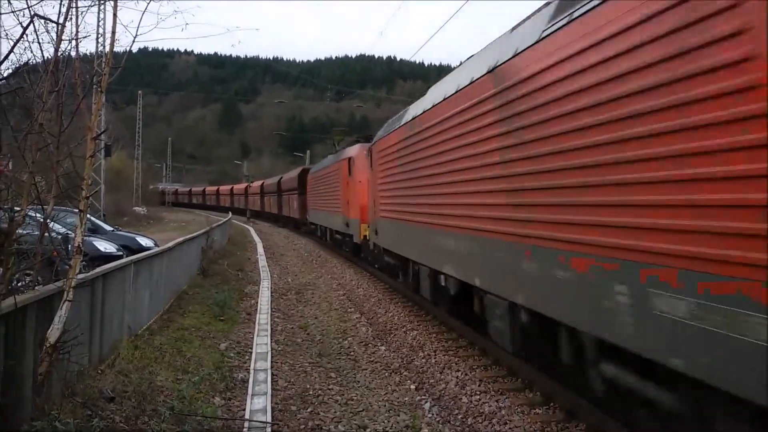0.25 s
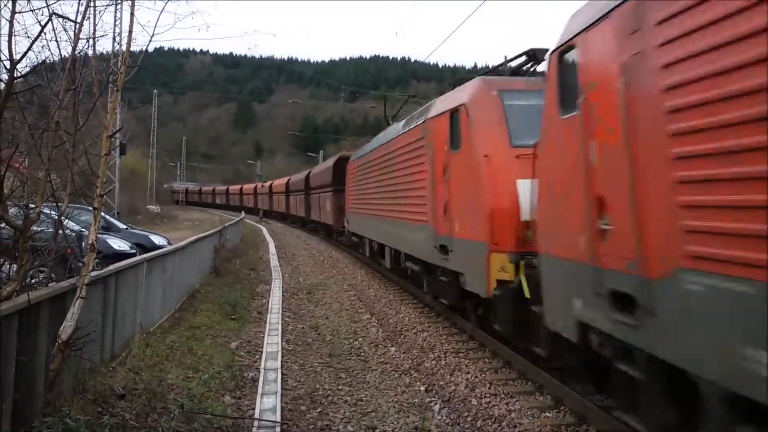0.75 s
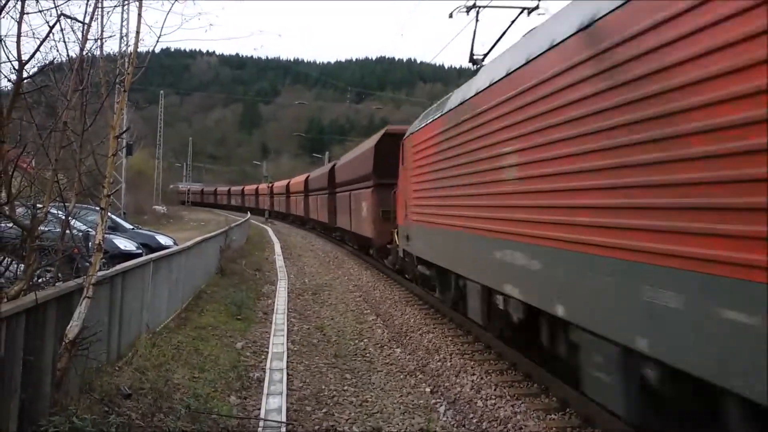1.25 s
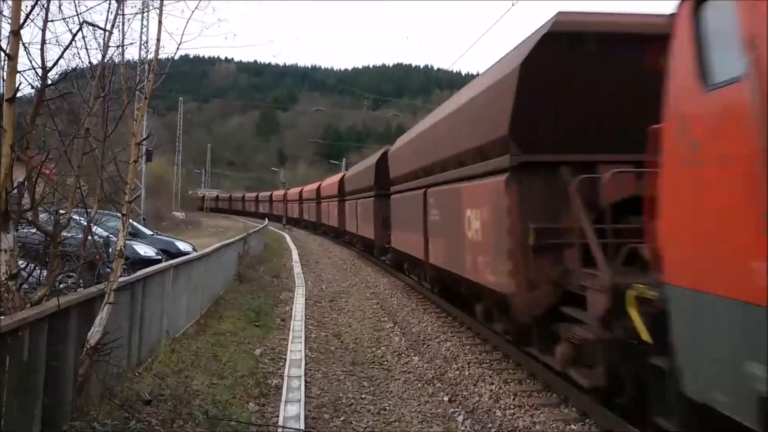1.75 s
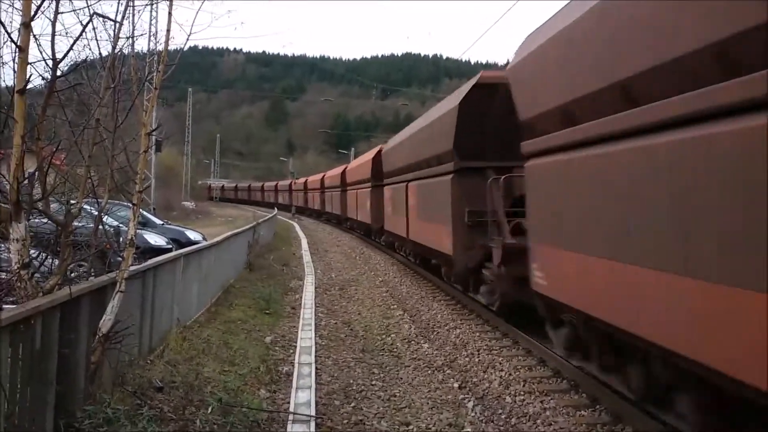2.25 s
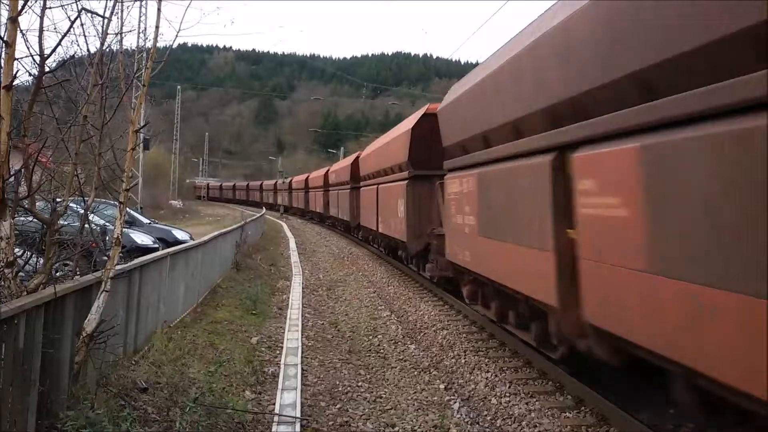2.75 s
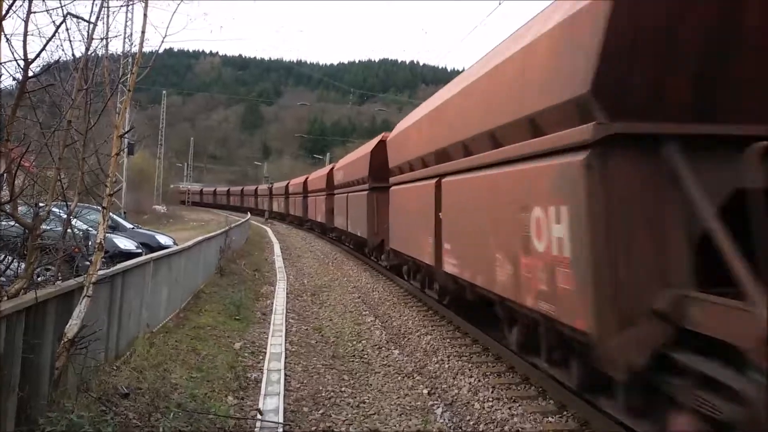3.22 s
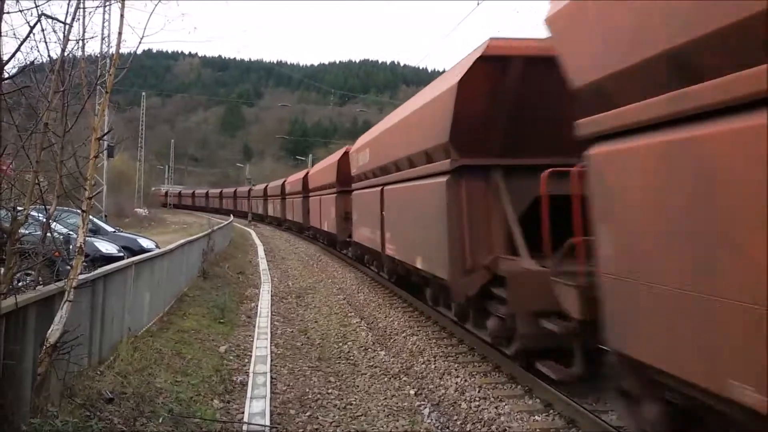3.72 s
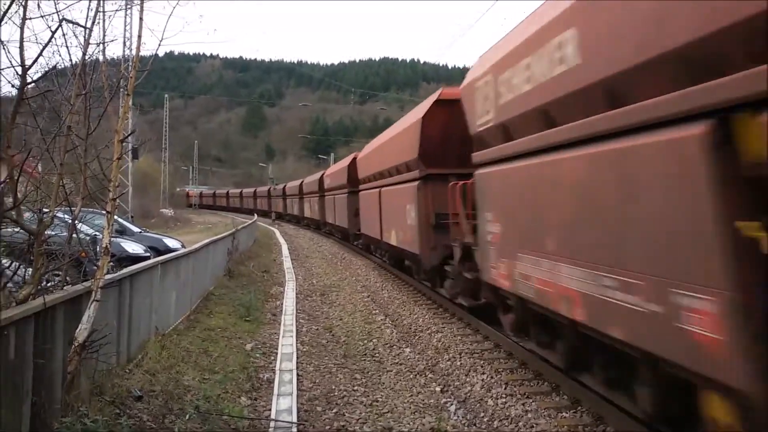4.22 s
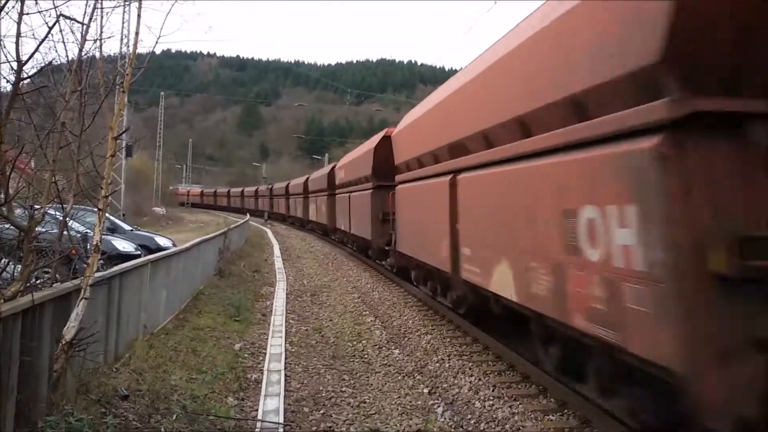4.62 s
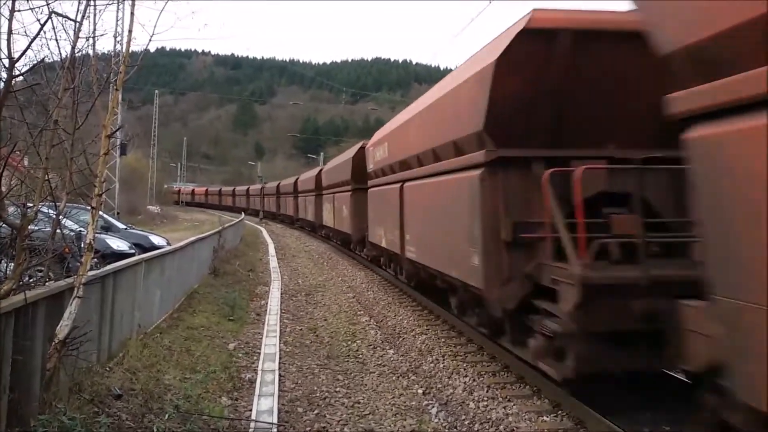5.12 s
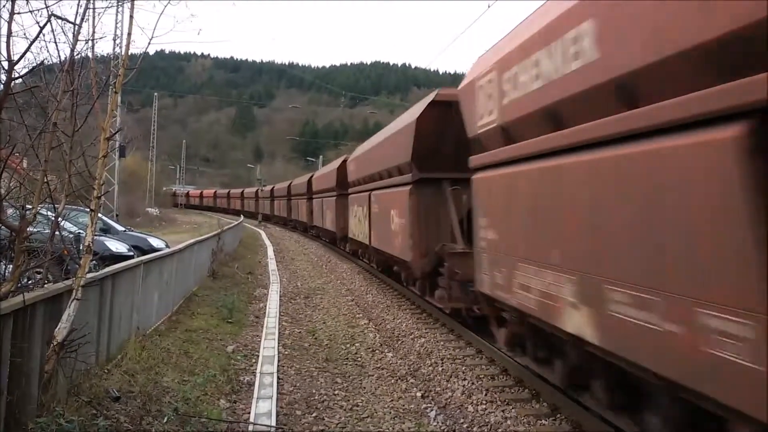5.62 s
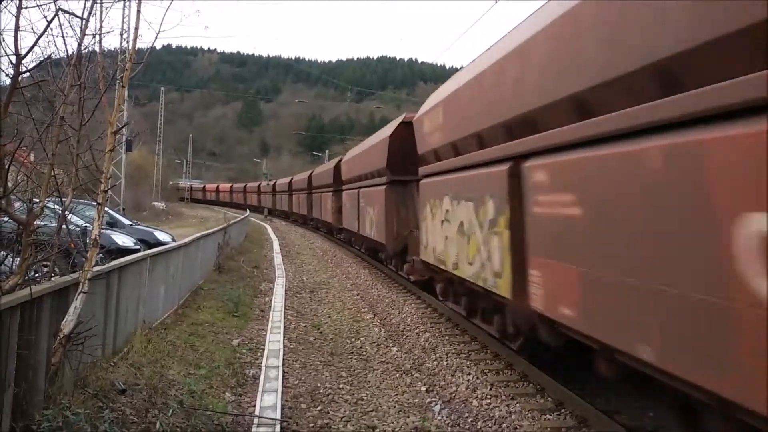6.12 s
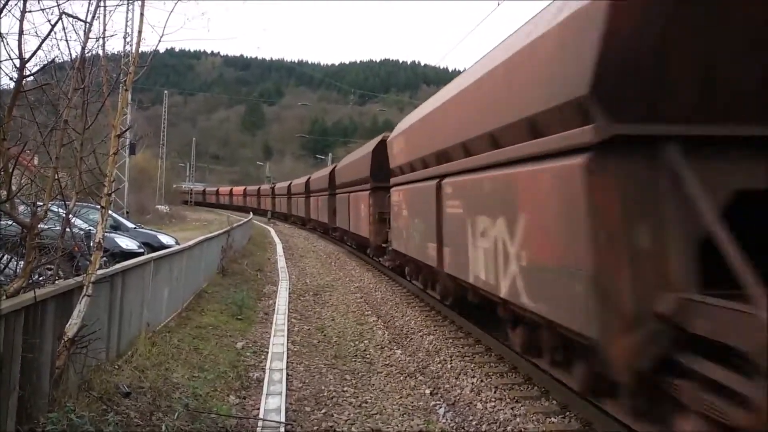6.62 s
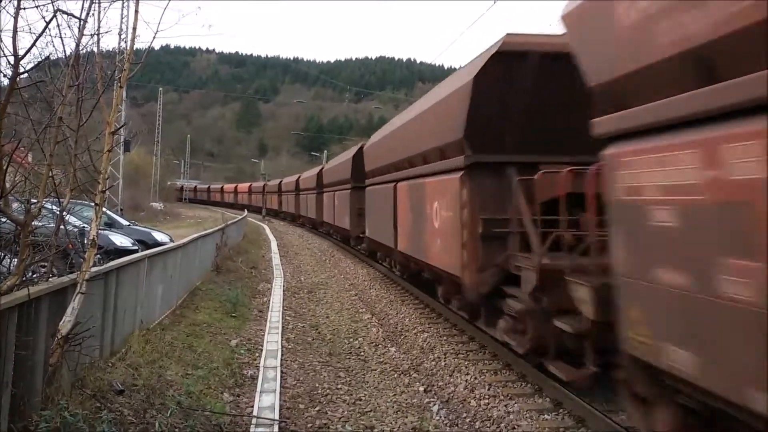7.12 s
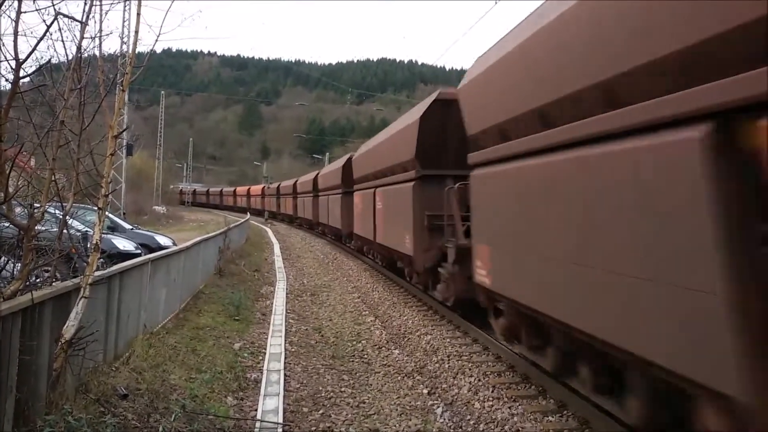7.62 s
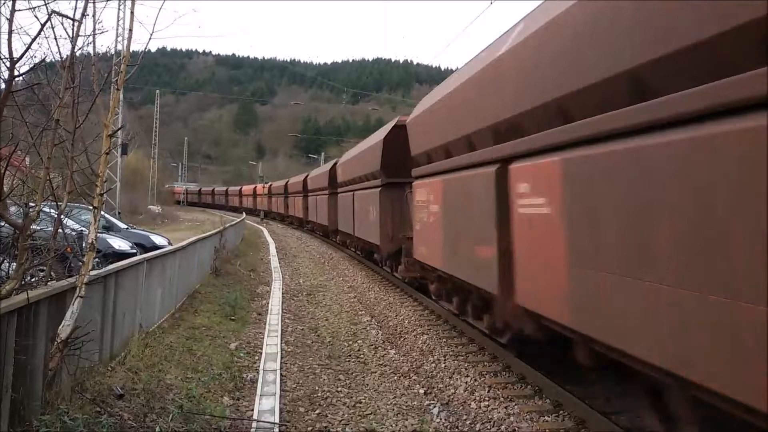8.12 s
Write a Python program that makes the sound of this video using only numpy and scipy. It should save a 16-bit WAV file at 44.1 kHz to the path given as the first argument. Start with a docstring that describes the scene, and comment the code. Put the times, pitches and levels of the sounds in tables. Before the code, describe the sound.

Outdoors right beside a railway track, two electric locomotives sweep past with a fuzzy, wavering mid-high whine, droning blowers and low surges. Around one and a half seconds, slipstream batters the small microphone in harsh, distorted slaps. The whine vanishes and hopper wagons follow with a steady rolling roar, hissing and slightly metallic, swelling as bogies pass and growing louder, with lighter wind thumps. Mono, close, dry.

```python
"""Beside a railway line, two electric locomotives and a string of hopper wagons rush past a small microphone.
The drives whine as fuzzy and gliding tones, and the blowers drone and hiss as filtered noise.
Then the wagon wheels roar on the rails: coloured noise with narrow ringing bands.
The slipstream slaps the microphone in short noise bursts, and the recorder's limiter ducks under the hardest."""
import sys
import numpy as np
from scipy import signal
from scipy.fft import rfft, irfft, next_fast_len
from scipy.io import wavfile
from scipy.ndimage import uniform_filter1d, map_coordinates

SR = 44100
rng = np.random.default_rng(int(sys.argv[2]) if len(sys.argv) > 2 else 0)


def to_wav(sig):
    """Store sig (one row per channel, or 1-D mono) as 16-bit WAV at the path in sys.argv[1].

    Samples outside -1..1 are clipped; the rate is SR.
    """
    pcm = np.clip(np.atleast_2d(sig), -1, 1) * 32767
    pcm = np.round(pcm).astype(np.int16)
    wavfile.write(sys.argv[1], SR, pcm.T)  # frames by channels


N = 368676
TIME = np.arange(N) / SR
TOP_HZ = 14800  # the recorder's band limit

# All spectra are relative: the noise they colour is afterwards brought to rms 1.
# Widths of resonances and fuzzy tones are full widths, about 4 dB down.

# Gusts of slipstream. Each row: start in seconds, length in seconds, level in dB.
GUSTS = [(0.038, 0.7, -21.5), (0.923, 0.23, -24), (1.312, 0.24, -22), (1.62, 0.085, -11.5),
         (1.792, 0.036, -15), (2, 0.25, -20.5), (2.587, 0.12, -18), (3.05, 0.13, -22.5),
         (3.558, 0.355, -20.5), (3.99, 0.45, -20.5), (5.11, 0.26, -23), (5.574, 0.043, -27),
         (5.82, 0.15, -21.5), (6.21, 0.27, -23.5), (6.84, .12, -21), (7.024, 0.042, -19),
         (7.167, 0.17, -19), (7.928, 0.13, -20.5)]
GUST_RISE_S, GUST_FALL_S, LULL_DB = 0.07, 0.051, -29.5
# Colour of the slipstream's flutter. Each row: frequency in Hz, density in dB per Hz.
SLIPSTREAM_SPECTRUM = [(15, -24), (30, -13), (60, 5), (110, 8.5), (200, 4.5), (400, -4.5), (1200, -92)]
# Small eddies carried in the gusts: rate, typical length, level over the gust, typical brightness.
EDDIES_PER_S, EDDY_S, EDDY_DB, EDDY_HZ = 14, 0.012, -1, 420
# The hardest eddies that hit the microphone.
# Each row: start in seconds, length in seconds, level in dB before the port, brightness in Hz.
BUFFETS = [(.288, 0.023, -8.5, 555), (.289, 0.0043, -10, 1100), (.42, 0.094, -18.5, 396),
           (.6, 0.037, -14.5, 350), (.748, 0.03, -16.5, 795), (1.58, 0.013, -5, 5270),
           (1.572, 0.036, -14.5, 1500), (1.608, 0.012, -2.5, 4316), (1.605, 0.075, -6, 1710),
           (1.621, 0.026, -1.5, 4100), (1.623, 0.04, -4, 330), (1.643, 0.018, 2.5, 4160),
           (1.673, 0.0098, -4.5, 3200), (1.659, 0.0087, -13, 2600), (1.692, 0.025, -5.5, 850),
           (1.753, 0.014, -7, 450), (1.764, 0.019, -7.5, 2710), (1.79, 0.0016, 1.5, 3580),
           (1.803, 0.044, -13.5, 1390), (1.812, 0.012, -21, 2400), (1.829, 0.015, -9.5, 2700),
           (1.892, 0.022, -15, 1200), (1.898, 0.0061, -22, 2300), (1.915, 0.011, -14.5, 1300),
           (1.968, 0.025, -18.5, 650), (2.086, 0.023, -17.5, 1200), (2.093, 0.003, -11, 2800),
           (2.156, 0.022, -18.5, 1400), (2.159, 0.006, -13.5, 1700), (2.403, 0.031, -24, 400),
           (2.409, 0.0035, -14.5, 1100), (2.557, 0.013, -19, 500), (2.611, 0.043, -20, 520),
           (2.676, 0.015, -15, 850), (3.011, 0.042, -15.5, 490), (3.066, 0.067, -18, 450),
           (3.193, 0.0066, -10.5, 450), (3.555, 0.047, -14, 760), (3.635, 0.0063, -12, 1010),
           (3.677, 0.051, -13, 990), (3.736, 0.019, -11, 1350), (3.742, 0.015, -7.5, 400),
           (3.76, 0.023, -14, 700), (3.834, 0.005, -12.5, 1290), (3.843, 0.0057, -6, 900),
           (4.326, 0.017, -14.5, 700), (4.344, 0.016, -9.5, 1240), (4.379, 0.0054, -9.5, 450),
           (4.424, 0.082, -20, 350), (4.452, .015, -16, 520), (6.91, 0.062, -13.5, 650),
           (6.937, 0.026, -9, 1250), (6.944, 0.012, -6.5, 900), (7.008, 0.018, -13, 600),
           (7.034, 0.029, -9.5, 900), (7.051, 0.0089, -8, 1000), (7.134, 0.0089, -12, 543),
           (7.248, 0.019, -10, 560), (7.295, .014, -18, 450), (7.96, 0.092, -12, 583)]

# The locomotives' drives. Each row: time in seconds, whine in Hz, relative whine level in dB, blower level in dB.
DRIVE = [(0, 1278, -27.5, -29), (.21, 1291, -27, -18), (.35, 1262, -33.5, -22), (.5, 1261, -26.5, -20.5),
         (.62, 1242, -26, -21), (.8, 1260, -27, -22.5), (.97, 1304, -29, -21), (1.15, 1246, -24.5, -22),
         (1.29, 1276, -29, -26), (1.53, 1221, -24.5, -17.5)]
# Orders of the gear mesh. Each row: multiple of the mesh rate, width in Hz, relative level in dB.
MESH_ORDERS = [(1, 24, -2.5), (2, 117, 2.5), (3, 135, -2)]
# Resonances of the blower ducts. Each row: centre in Hz, width in Hz, relative level in dB.
DUCTS = [(221, 130, -5.5), (323, 85, 4), (438, 37, -3), (587, 90, -12.5)]
# The cooling outlet of each locomotive goes by. Each row: start in seconds, length in seconds, level in dB.
OUTLETS = [(0.272, 0.23, -34), (1.228, 0.19, -35)]
# Colour of the cooling hiss. Each row: frequency in Hz, density in dB per Hz.
COOLING_SPECTRUM = [(5000, -23), (9500, -0.5), (11000, -7), (12700, 3), (14500, -1.5)]
# The four driven axles of the second locomotive.
# Each row: start in seconds, length in seconds, pitch in Hz, Doppler glide in Hz per second, level in dB.
AXLES = [(.82, 0.37, 1274, -150, -24.5), (0.942, .36, 1330, -190, -25), (1.249, .27, 1258, -250, -23.5),
         (1.39, 0.16, 1288, -160, -26.5)]
# Narrow low surges as the first locomotive sweeps by.
# Each row: start in seconds, length in seconds, pitch in Hz, glide in Hz per second, level in dB.
SURGES = [(.14, .03, 636, 0, -24.5), (0.253, 0.065, 205, 201, -15.5), (0.307, 0.038, 387, 302, -17),
          (0.311, .06, 520, 1299, -22.5), (0.428, 0.065, 288, 600.5, -16), (.48, .05, 540, 1, -29),
          (.59, 0.062, 254.6, -150, -12.5), (.65, .045, 440, 1299.5, -21), (.7, .03, 180, -400, -16.5),
          (.765, .09, 580, 650, -21)]

# Rolling effort, set by how rough the passing wheels are. Each row: time in seconds, relative level in dB.
ROLLING_EFFORT = [(0, -33.5), (.5, -32), (.9, -38.5), (1.13, -38), (1.22, -33.5), (1.52, -35), (1.75, -38),
                  (2.3, -32.5), (2.85, -30), (3.18, -25.5), (3.45, -22), (3.8, -29.5), (4.15, -26.5),
                  (4.5, -26), (4.92, -27.5), (5.45, -22), (5.65, -23), (6.25, -19.5), (6.65, -17.5),
                  (6.85, -19), (7.05, -24), (7.4, -21), (7.75, -23.5), (8.36, -21)]
# Bogies that stand out as they go by. Each row: start in seconds, length in seconds, swell in dB.
BOGIES = [(0.174, 0.041, 3.5), (0.508, 0.055, 2.5), (1.39, 0.1, 2.5), (3.226, 0.049, 1), (3.617, 0.05, 6),
          (3.877, 0.12, 4.5), (4.077, 0.049, 2.5), (4.379, 0.022, 5), (4.633, 0.064, 7),
          (4.754, 0.055, 3.5), (5.022, 0.072, 6.5), (5.283, 0.061, 3), (5.71, 0.088, 3.5), (5.91, 0.15, 2),
          (7.187, 0.019, 1), (7.992, 0.011, 3), (8.16, 0.06, 3.5)]
BOGIE_RISE_S, BOGIE_FALL_S = 0.015, 0.038
# Colours of the rolling hiss and rumble. Each row: frequency in Hz, density in dB per Hz.
LOCO_HISS = [(1240, -18), (2100, 1.5), (2380, -0.5), (2590, -1.5), (2970, 1), (4500, 4.5), (8750, -14),
             (10500, -32), (11000, -52), (14300, -42), (22000, -120)]
WAGON_HISS = [(650, -33), (1100, -9), (1280, -3.5), (1890, -3), (2300, 0), (3960, 0), (5440, -5.5),
              (6800, -15), (8240, -21), (9400, -28), (11000, -57), (14500, -53.5)]
LOCO_RUMBLE = [(50, -10.5), (130, 6), (230, 7.5), (350, -6.5), (520, 1), (800, -6.5), (1100, -6.5),
               (1900, -12), (3000, -16.5), (6000, -69)]
WAGON_RUMBLE = [(60, -10.5), (150, -2), (290, 4), (420, 0.5), (680, -1.5), (900, -2.5), (1200, -12),
                (2000, -5.5), (4000, -80.5)]
# Rumble level under the locomotives; under the wagons at the reference effort, and dB per dB of effort.
LOCO_RUMBLE_DB, WAGON_RUMBLE_DB, REFERENCE_DB, RUMBLE_FOLLOWS = -17.5, -22.5, -24.5, 0.69
RUMBLE_GROWS_DB_PER_S = 0.61  # the later wagons rumble more
# Resonances of wheels and rails. Each row: centre in Hz, width in Hz, relative level in dB.
WHEEL_RINGS = [(476, 21, -11.5), (566, 39, -14.5), (978, 140, -9.5), (1905, 150, -14.5), (3870, 280, -13)]


def amp(db):
    """Level to gain: 20 dB is a factor of ten in pressure."""
    return 10 ** (np.asarray(db) / 20)


def unit(x):
    """Normalisation: scale to rms 1."""
    return x / np.sqrt(np.mean(np.abs(x) ** 2) + 1e-20)


def curves(rows):
    """Linear interpolation: one value per sample for each column after the time."""
    times, *columns = np.transpose(rows)
    return [np.interp(TIME, times, column) for column in columns]


def wobble(rate):
    """Slow random fluctuation: a smooth curve through rate random knots a second."""
    knots = rng.standard_normal(int(N * rate / SR) + 4)
    return map_coordinates(knots, [TIME * rate])


def swell(start, hold, rise, fall):
    """Envelope of a passage: Gaussian rise, hold at 1, Gaussian fall."""
    before = np.minimum(TIME - start, 0) / rise
    after = np.maximum(TIME - start - hold, 0) / fall
    return np.exp(-before ** 2 - after ** 2)


def filtered(x, response):
    """Linear filtering: multiply the spectrum by a response of frequency."""
    size = next_fast_len(len(x) + 8192)
    spectrum = rfft(x, size) * response(np.fft.rfftfreq(size, 1 / SR))
    return irfft(spectrum, size)[:len(x)]


def rush(spectrum, patchy_db):
    """Turbulent noise of rms 1: a given colour, with patches of random gain in time and frequency."""
    z = signal.stft(rng.standard_normal(N), nperseg=512)[2]
    field = uniform_filter1d(rng.standard_normal(z.shape), size=8, axis=0)  # patches about 700 Hz wide
    field = uniform_filter1d(field, size=10, axis=1)  # and about 60 ms long
    noise = signal.istft(z * amp(patchy_db * unit(field)), nperseg=512)[1][:N]
    f, db = np.transpose(spectrum)
    return unit(filtered(noise, lambda hz: amp(np.interp(np.log(hz + 1), np.log(f), db))))


def resonance(centre_hz, width_hz):
    """Forced resonance: noise of rms 1 in one steep-sided band."""
    noise = rng.standard_normal(N)
    return unit(filtered(noise, lambda hz: 1 / (1 + ((hz - centre_hz) / width_hz * 1.47) ** 2)))


def phase_of(hz):
    """Phase is the running integral of frequency."""
    return 2 * np.pi * np.cumsum(hz) / SR


def fuzzy_tone(phase, width_hz):
    """Narrow-band noise of rms 1: a tone whose two quadratures drift at random."""
    def drift():
        return filtered(rng.standard_normal(N), lambda hz: 1 / (1 + (hz / width_hz * 1.5) ** 2))
    return unit(drift() * np.cos(phase) + drift() * np.sin(phase))


def handover(loco, wagons, at=1.64, span=0.29):
    """Equal-power crossfade: the locomotives' sound gives way to that of the wagons."""
    share = np.clip((TIME - at) / span + .5, 0, 1)
    return np.sqrt(1 - share) * loco + np.sqrt(share) * wagons


def wind():
    """Strength of the air flow: the strongest gust, added in power to a steady draught."""
    gusts = [amp(db) * swell(s, length, GUST_RISE_S, GUST_FALL_S) for s, length, db in GUSTS]
    return np.hypot(amp(LULL_DB), np.max(gusts, axis=0))


def slipstream(flow):
    """Turbulent pressure: air dragged along by the train flutters on the microphone."""
    flutter = amp(0.91 * wobble(rate=43))
    return flow * unit(flutter * rush(SLIPSTREAM_SPECTRUM, patchy_db=2.5))


def gust_eddies(flow):
    """Random shedding: buffet rows at jittered moments, as strong as the flow that carries them."""
    chance = rng.standard_normal((int(EDDIES_PER_S * N / SR), 3))
    times = (np.arange(len(chance)) + .5 + .3 * chance[:, 0]) / EDDIES_PER_S
    times = np.clip(times, 0, TIME[-1])
    flow_db = 20 * np.log10(np.interp(times, TIME, flow))
    return [(s, EDDY_S * np.exp(0.47 * longer), db + EDDY_DB, EDDY_HZ * np.exp(0.4 * brighter))
            for s, db, (_, longer, brighter) in zip(times, flow_db, chance)]


def buffets(eddies, edge_s=0.0018, wake=0.16, low_hz=95, steep=1.76, tilt=0.97, lumpy_db=3, port_hz=6800):
    """Eddy impact: a lumpy burst of pressure with a fading wake; a faster eddy's finer swirls sound brighter."""
    out = np.zeros(N + SR)
    t = np.arange(SR // 5) / SR
    for s, length, db, bright_hz in eddies:
        decay = np.exp(-np.maximum(t - length, 0) / (wake * length))
        gate = np.clip(t / edge_s, 0, 1) * decay
        swirls = unit(uniform_filter1d(rng.standard_normal(len(t)), size=70))
        pressure = rng.standard_normal(len(t)) * amp(lumpy_db * swirls)
        corner_hz = low_hz + 0.025 * bright_hz  # brighter eddies carry less bass

        def colour(hz):
            hump = (hz / (hz + corner_hz)) ** 2 * (1 + hz / corner_hz) ** -tilt
            return hump / np.sqrt(1 + (hz / bright_hz) ** (2 * steep))

        burst = gate * filtered(pressure, colour)
        out[round(s * SR):][:len(t)] += amp(db) * unit(burst) * np.sqrt(np.mean(gate ** 2))
    # the narrow port dulls the finest swirls
    return filtered(out[:N], lambda hz: 1 / np.sqrt(1 + (hz / port_hz) ** 8))


def growl(fade_s=0.013, width_hz=30):
    """Gliding narrow-band noise: short low surges, most of them climbing in pitch."""
    return sum(amp(db) * swell(s, length, fade_s, fade_s)
               * fuzzy_tone(phase_of(hz + glide * (TIME - s)), width_hz)
               for s, length, hz, glide, db in SURGES)


def near_axles(fade_s=0.023, flutter_hz=5):
    """Doppler shift and beating: each driven axle sinks in pitch going by and beats against its neighbour."""
    total = np.zeros(N)
    for s, length, hz, glide, db in AXLES:
        pitch_hz = hz + glide * (TIME - s) + flutter_hz * wobble(rate=45)
        total += amp(db) * swell(s, length, fade_s, fade_s) * unit(np.sin(phase_of(pitch_hz)))
    return total


def locomotives(outlet_fade_s=0.11):
    """Gear mesh and duct resonance: several axles blur into a whine; blowers drone and hiss at the outlets."""
    whine_hz, whine_db, blower_db = curves(DRIVE)
    mesh_phase = phase_of(whine_hz + 10 * wobble(rate=40)) / 2  # the whine is the second mesh order
    gears = sum(amp(db) * fuzzy_tone(round(order) * mesh_phase, width) for order, width, db in MESH_ORDERS)
    blowers = unit(sum(amp(db) * resonance(hz, width) for hz, width, db in DUCTS))
    gone_s = np.maximum(TIME - DRIVE[-1][0], 0)  # since the second machine went past
    drive = amp(whine_db - 23.6 * gone_s) * gears + amp(blower_db - 34 * gone_s) * blowers
    # the hiss beams sideways, so it swells only as each outlet passes
    beam = sum(amp(db) * swell(s, length, outlet_fade_s, outlet_fade_s) for s, length, db in OUTLETS)
    return drive + near_axles() + growl() + beam * rush(COOLING_SPECTRUM, patchy_db=7.0)


def wheel_rings(pitch_spread=.012, uneven_db=1.0):
    """Modal ringing of wheels and rails: pitch and strength vary as one wheel follows another."""
    shift = 1 + pitch_spread * wobble(rate=5)
    return sum(amp(db) * unit(amp(uneven_db * wobble(rate=7)) * fuzzy_tone(phase_of(hz * shift), width))
               for hz, width, db in WHEEL_RINGS)


def rolling():
    """Roughness excitation: hiss and ringing from wheels on rails, rumble from track and bodies."""
    effort_db, = curves(ROLLING_EFFORT)
    bogie_db = sum(db * swell(s, length, BOGIE_RISE_S, BOGIE_FALL_S) for s, length, db in BOGIES)
    tread_db = 0.83 * wobble(rate=55)  # the contact patches grip unevenly
    loco_hiss = amp(7.5) * rush(LOCO_HISS, patchy_db=0.5)
    wagon_hiss = amp(2.0) * rush(WAGON_HISS, patchy_db=1.1) + wheel_rings()
    hiss = amp(effort_db + bogie_db + tread_db) * handover(loco_hiss, wagon_hiss)

    rumble_db = WAGON_RUMBLE_DB + RUMBLE_FOLLOWS * (effort_db - REFERENCE_DB)
    rumble_db += RUMBLE_GROWS_DB_PER_S * (TIME - TIME.mean())
    loco_rumble = amp(LOCO_RUMBLE_DB) * rush(LOCO_RUMBLE, patchy_db=2)
    wagon_rumble = amp(rumble_db) * rush(WAGON_RUMBLE, patchy_db=1.15)
    rumble = amp(0.16 * wobble(rate=23)) * handover(loco_rumble, wagon_rumble)
    return hiss + rumble


def scene():
    """Superposition: all pressures add at one microphone, which feeds both channels."""
    flow = wind()
    eddies = [*BUFFETS, *gust_eddies(flow)]
    mono = slipstream(flow) + buffets(eddies) + locomotives() + rolling()
    return np.array([mono, mono])


def limiter(x, ceiling_db=-7, release_db=60):
    """Gain control: short-term power over the ceiling lowers the gain, which recovers release_db a second."""
    power = np.abs(uniform_filter1d(x ** 2, size=220))  # 5 ms mean
    over_db = np.maximum(10 * np.log10(power + 1e-12) - ceiling_db, 0)
    held_db = np.maximum.accumulate(over_db + release_db * TIME) - release_db * TIME
    return x * amp(-uniform_filter1d(held_db, size=128))


def record(dry):
    """Saturation and band limiting: the recorder limits, rounds off overshoots and cuts all above TOP_HZ."""
    held = np.array([limiter(x) for x in dry])
    clipped = held / (1 + held ** 8) ** (1 / 8)
    return np.array([filtered(x, lambda hz: hz < TOP_HZ) for x in clipped])


dry = scene()
out = record(dry)
to_wav(out)
```